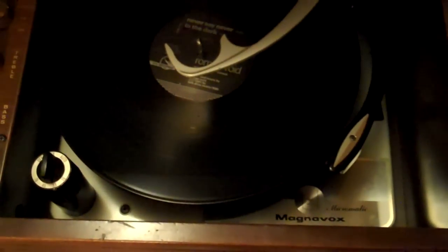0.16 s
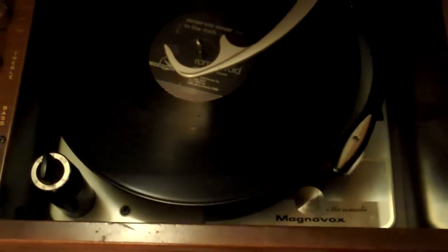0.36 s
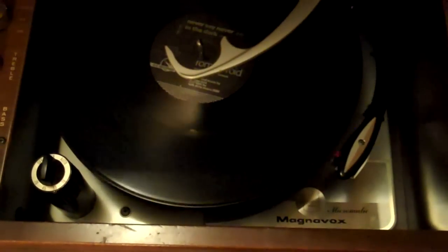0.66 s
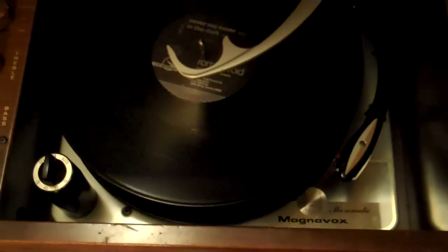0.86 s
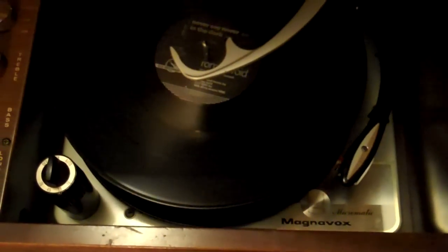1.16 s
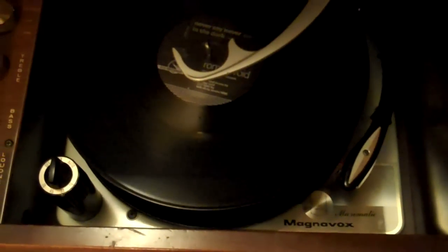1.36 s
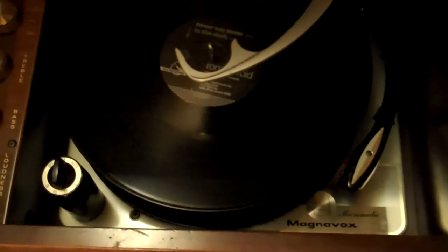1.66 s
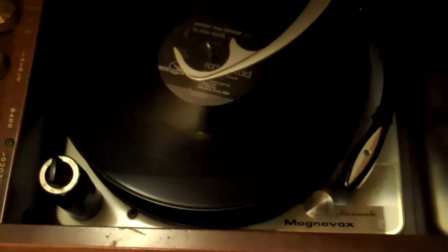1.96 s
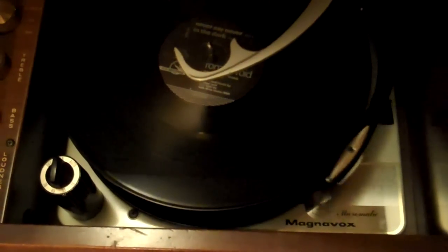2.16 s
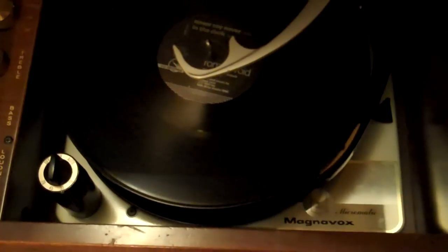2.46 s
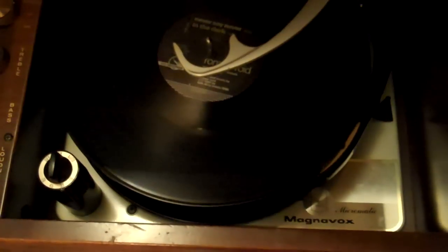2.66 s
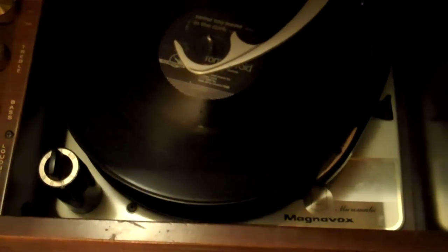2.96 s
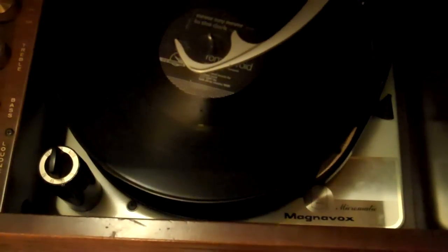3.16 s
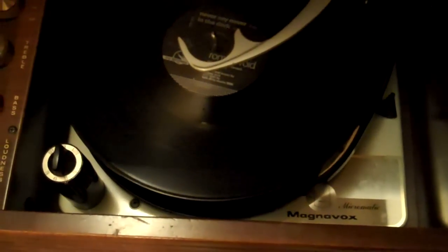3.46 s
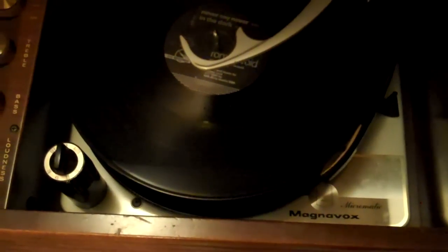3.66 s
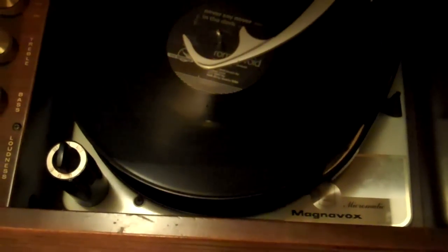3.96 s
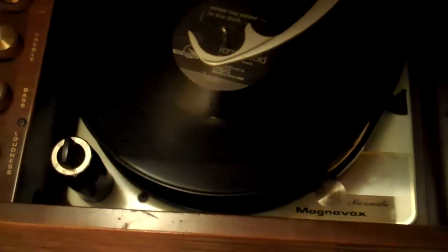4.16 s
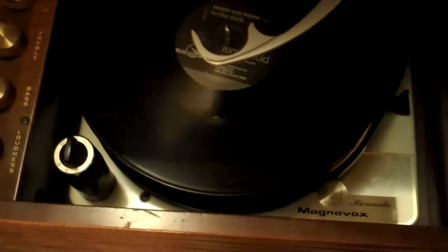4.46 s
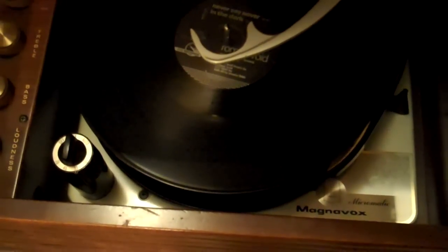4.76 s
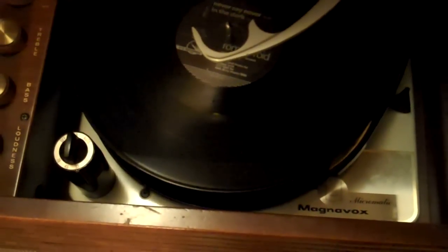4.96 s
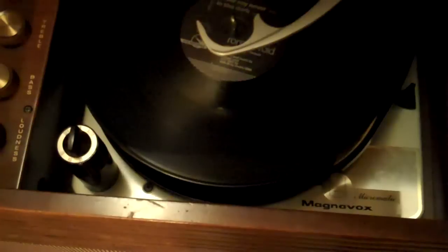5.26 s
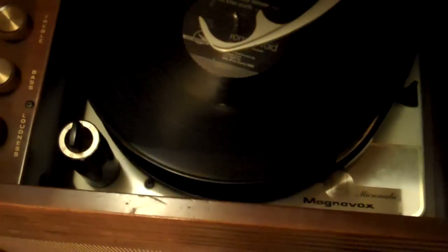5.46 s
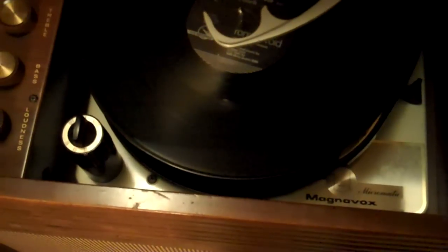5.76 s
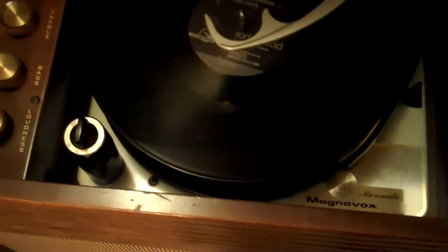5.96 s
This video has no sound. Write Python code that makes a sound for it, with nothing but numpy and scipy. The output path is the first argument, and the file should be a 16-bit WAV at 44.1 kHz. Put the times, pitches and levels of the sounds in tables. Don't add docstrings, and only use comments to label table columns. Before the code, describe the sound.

A record changer in an open wooden cabinet runs through its cycle, heard very close in a quiet room. A metallic click leads to a loud cluster of clacks and a shuddering rattle, then a few small ratchet ticks and a lighter click. Sliding parts scrape softly, low wooden thumps follow, and a second set of bright snaps ends in faint settling over low hum and hiss.

```python
import sys
import numpy as np
from scipy import signal
from scipy.fft import rfft, irfft, next_fast_len
from scipy.io import wavfile
from scipy.ndimage import uniform_filter1d

SR = 44100
rng = np.random.default_rng(int(sys.argv[2]) if len(sys.argv) > 2 else 0)


def ratio_of_db(decibels):
    return 10 ** (np.asarray(decibels, float) / 20)


def store_wav(level_fs):
    pcm = np.round(np.clip(np.atleast_2d(level_fs), -1, 1) * 32767)
    wavfile.write(sys.argv[1], SR, pcm.T.astype(np.int16))


N = 269446
FAST = next_fast_len(N)
HZ = np.fft.rfftfreq(FAST, 1 / SR)

# (frequency [Hz], level [dB per Hz])
AIR_BASS = [(30, -22.5), (52, -9), (87, -14), (195, -3), (247, -9.5), (290, -10.5), (321, -7.5),
            (506, -11.5), (650, -10.5), (699, -10.5), (1500, -17), (1950, -29.5), (3300, -120)]
AIR_TREBLE = [(2000, -21), (3000, -27.5), (5000, -29), (7000, -31), (8000, -30), (9000, -33.5),
              (14100, -34), (14300, -78)]
# (frequency [Hz], likeness [0-1])
AIR_LIKENESS = [(60, 0.5), (130, 0.92), (290, 0.94), (640, 0.87), (1410, 0.6), (3100, 0), (6820, 0),
                (15000, 0.1)]
# (frequency [Hz], rms level [dB])
MOTOR_HUM = [(194, -73.5), (322, -63.5), (950, -76.5), (60, -92), (373, -69.5)]
# (multiple of mains [1], rms level [dB])
MAINS_BUZZ = [(4, -67), (9, -73.5), (10, -75), (11, -72.5), (13, -77.5), (17, -78), (27, -79.5), (35, -84),
              (39, -81), (49, -84), (51, -79), (53, -86), (57, -89.5), (63, -92), (65, -84.5), (67, -85.5),
              (81, -94), (87, -92), (120, -98)]
# (frequency [Hz], level [dB])
CASE_FLUTTER = [(18.1, -71.5), (18.45, -68.5), (18.7, -64)]
# (frequency [Hz], width [Hz], gain [1])
PORT_CAVITIES = [(8500, 1700, .72), (6000, 1200, -.25)]

# (frequency [Hz], width [Hz], level [dB])
RUBBED_PARTS = [(2350, 41, -5), (2650, 9.9, -4), (3100, 17, -14.5), (3505, 92, -6.5), (4450, 42, -8),
                (4820, 21, -10), (5507, 130, -9), (6240, 170, -1), (6520, 190, -6), (6500, 52, -7),
                (7600, 570, 3)]
# (time [s], hold [s], dull scrape level [dB], bright re dull level [dB])
SLIDING_MOVES = [
    (0.0, 0.095, -58.5, -1.5),
    (0.473, 0.12, -82, 15),
    (0.739, 0.057, -76, -7),
    (0.921, 0.019, -52, 18),
    (1.169, 0.083, -76.5, -16.5),
    (2.049, 0.29, -66, -7.5),
    (3.445, 0.14, -66.5, -1.5),
    (4.19, 0.052, -59, 0),
    (4.333, 0.019, -42, 5.5),
    (4.496, 0.2, -81.5, 8.5),
]
# (time [s], level [dB])
PLATE_SHUDDER = [
    (0.915, -30.5),
    (0.967, -29.5),
    (1.001, -28),
    (1.02, -37.5),
    (1.042, -30),
    (1.05, -26.5),
    (1.1, -40),
    (1.17, -63),
]
# (start [s], end [s], frequency [Hz], width [Hz], rms level [dB])
SQUEAK_EVENTS = [(0.038, 0.133, 5450, 200, -59), (0.789, 0.794, 5900, 400, -37),
                 (0.804, 0.845, 1030, 250, -47), (2.124, 2.246, 4450, 700, -64),
                 (2.09, 2.308, 7700, 500, -69), (2.222, 2.28, 6000, 200, -66),
                 (3.562, 3.632, 4450, 250, -63), (3.554, 3.598, 6600, 1500, -52),
                 (3.926, 4.019, 5410, 3500, -62), (4.213, 4.265, 730, 250, -45.5),
                 (4.541, 4.862, 6240, 452, -67.5), (4.556, 4.776, 2490, 80.3, -69),
                 (4.544, 4.677, 7320, 302, -64.5), (5.905, 5.927, 717, 300, -55)]

# (frequency [Hz], level [dB], T60 [s])
CABINET_MODES = [(86.06, -10.5, 0.11), (151, -2.5, .12), (188, -3, 0.095), (284, -7, 0.1), (335, -9, 0.086),
                 (357, -8, 0.21), (500, -13, 0.098), (614, -13.5, 0.11), (655, -9.5, 0.034)]
# (time [s], peak level [dB], T60 [s])
CABINET_THUMPS = [(0.696, -36, 0.06), (0.856, -30, 0.15), (0.885, -30.5, 0.14), (1.879, -52, 0.063),
                  (3.148, -43.5, 0.098), (3.188, -39.5, 0.065), (3.248, -40.5, 0.048), (3.368, -35, 0.081),
                  (3.384, -35.5, 0.14), (3.452, -25, 0.07), (3.476, -30, 0.091), (3.575, -35, 0.045),
                  (3.591, -33.5, 0.13), (3.897, -42, 0.13), (4.179, -52, 0.097), (4.273, -37, 0.062),
                  (4.292, -31, 0.21), (4.357, -36, 0.16), (4.447, -38, 0.11), (4.549, -40, 0.051)]

# (time [s], peak level [dB],
# pitch [Hz], T60 [ms])
SMALL_TAPS = [(0.242, -25, 4530, 42), (.2430, -12.5, 6500, 10), (.2480, -26, 6430, 12),
              (0.6988, -12.5, 5840, 3.9), (0.704, -9, 6200, 27), (0.7081, -8, 7000, 9.1),
              (.7090, -12, 4100, 11), (0.715, -26, 6600, 53), (.8080, -43, 7400, 15),
              (0.86, -1.5, 7050, 15), (0.8606, -11, 1470, 8.3), (0.8592, -5, 3630, 9.8),
              (0.8641, -16, 1410, 28), (0.871, -17.5, 1454, 30), (.8828, -14, 800, 27),
              (0.883, -4, 6195, 10), (0.884, -11, 2470, 26), (.8920, -10.5, 2280, 14),
              (.9005, -14, 700, 13), (.9022, -5, 8020, 9), (.9035, -8, 6450, 16), (.9060, -12, 1712, 20),
              (1.8686, -26, 2255, 15), (1.8700, -25.5, 4800, 7.8), (1.8705, -42, 905, 13),
              (1.8735, -40, 8000, 20), (1.881, -39, 690, 15), (1.8816, -17.5, 7450, 22),
              (1.8863, -17.5, 7800, 19), (1.9000, -49, 7600, 10.1), (3.3690, -44.5, 2500, 12),
              (3.4540, -29.5, 558, 20), (3.4940, -46, 6340, 27), (3.576, -40, 2690, 6),
              (3.5780, -42, 870, 50), (4.1935, -29, 7770, 18), (4.2742, -16, 6490, 12),
              (4.2795, -21, 6500, 15), (4.2907, -8.5, 7740, 8.8), (4.2904, -8, 10170, 5),
              (4.2960, -18, 6400, 22), (4.3015, -23, 6500, 31), (4.322, -29, 8500, 43),
              (4.3528, -17.5, 7770, 8.5), (4.3605, -17.5, 3090, 17), (4.362, -17, 5600, 10),
              (4.3625, -21, 7600, 9), (5.9050, -43.5, 807, 19), (.0020, -48, 1230, 95),
              (.7040, -16, 3450, 12), (.8870, -14, 1127, 42),
              (.020, -47, 760, 40), (.060, -49, 694, 76), (.085, -47, 684, 60), (.110, -47, 696, 50),
                  (.2405, -17, 6320, 16), (0.2402, -19, 7700, 6.6), (.241, -40.5, 573, 77),
                  (.2545, -32, 6500, 10), (0.5335, -29, 3350, 12), (.5352, -26, 7630, 6),
                  (.5355, -28.5, 5230, 8), (.762, -33, 6000, 8), (.8995, -12, 7460, 8),
                  (0.9223, -16.5, 6810, 12), (0.926, -16.5, 2720, 8), (.942, -19, 8300, 8.6),
                  (.953, -25, 6500, 14), (.960, -19, 2770, 10), (.983, -27, 760, 40), (.996, -26, 880, 39),
                  (1.008, -29, 7200, 10), (1.012, -32, 945, 15), (1.0448, -29, 8000, 7.8),
                  (1.0455, -24, 935, 19), (1.054, -32, 6500, 10), (1.067, -30, 6240, 10),
                  (1.07, -27, 2800, 8.8), (2.0805, -42, 2000, 5), (2.093, -39, 2080, 6.2),
                  (2.0935, -42.5, 3460, 7.4), (2.100, -42, 673, 25), (2.329, -45, 940, 16),
                  (2.334, -43.5, 7640, 8), (2.353, -35, 3170, 6), (2.354, -36, 2900, 7),
                  (2.353, -37, 560, 26), (2.916, -32.5, 6020, 9), (2.9177, -38, 1835, 14),
                  (2.926, -41.5, 1049, 23), (3.388, -48, 82, 68), (3.465, -42, 85.3, 100),
                  (3.469, -44, 2880, 8), (3.4775, -40.5, 2400, 18), (3.591, -44.5, 82, 90),
                  (4.27, -32.5, 513, 40), (4.295, -44.5, 85, 91), (5.904, -44.5, 7250, 9.5),
                  (3.368, -33, 190, 36), (3.4533, -27, 192, 24), (3.5758, -29.5, 240, 17)]
# (time [s], peak level [dB], modes as (frequency [Hz], level [dB], T60 [s]))
RINGING_PARTS = [
    (.2400, -14.5, [(1750, -19, .025), (3350, -12, .07), (4680, -5, .07), (6400, 0, .035), (6620, -4, .06), (7350, -14, .09), (8350, -7, .06), (10300, -13, .045)]),
    (.5340, -29, [(3400, -4, .014), (4250, -2, .026), (5136, -6, .025), (7790, -12, .035)]),
    (.6985, -15.5, [(581, 0, 0.055), (797, -6, 0.069), (1050, -14, 0.22)]),
    (1.8815, -22, [(4250, -4, .02), (5000, -5, .025), (7310, -2, .025), (7790, 0, .03)]),
    (2.3535, -31, [(547, 0, .045), (2140, -8, .025), (2600, -5, .025), (3090, -5, .025)]),
    (4.2900, -19.5, [(9900, -6, .015), (6519, -1, .075), (7604, 1, .03), (8349, -7, .06)]),
    (4.3605, -18, [(2950, -4, .03), (3060, 0, .04), (5600, -8, .02), (6470, -10, .035), (7700, -6, .02)]),
]

# (frequency [Hz], level [dB], T60 [s])
PLATE_LOW_MODES = [(452, -17, 1.0), (550.4, -6, 0.18), (676, -4, 0.2), (890, -6, 0.092), (1075, -8, 0.39),
                   (1180, -9.5, 0.72)]
PLATE_MID_MODES = [(1726, -10, 0.088), (2175, -4.5, 0.043), (2600, -17, 0.14), (2340, -15.5, 0.29),
                   (2940, -19.5, 0.064), (2686, -6, 0.13), (3262, -4, 0.046), (3360, -17, 0.15),
                   (3880, -21.5, 0.11)]
PLATE_TOP_MODES = [(4160, -18, 0.14), (4950, -15.5, 0.093), (5550, -22, 0.076), (6680, -3.5, 0.085),
                   (7617, -7.5, 0.034), (7620, -0.5, 0.038), (8410, 2.5, 0.026), (7860, -5, 0.09)]
PLATE_EDGE_MODES = [(9800, -2, .03), (10750, -3.5, 0.024), (10600, -6, 0.033)]
# (frequency [Hz], level [dB per Hz])
CRACK_SPECTRUM = [(180, -48), (300, -16), (378, -9.5), (824, -7), (1310, -7), (1710, -5.5), (2380, -8.5),
                  (2580, -7), (4250, -9), (6320, -9), (8240, -7.5), (13500, -31), (15700, -46.5)]
# (time [s], treble peak level [dB], middle re treble level [dB], rattle T60 [ms])
LATCH_SPRINGS = [(.23, -59, -8, 30), (.2401, -19.5, -11, 15), (.2445, -11, -14.5, 16),
                 (.7032, -7.5, -6, 35), (.859, 0.5, -6.5, 16), (.901, -2, -11.5, 38), (.927, -16, -2, 91),
                 (1.8805, -16.5, -5.5, 39), (4.2703, -23.5, 1, 34), (4.274, -12.5, -5.5, 41),
                 (4.279, -23.5, -1.5, 220)]
PAWLS = [(.5346, -25, -10, 29), (.54, -37, -15, 33), (.6985, -17, -2.5, 52), (.7086, -12, -10.5, 40),
         (3.144, -46.5, -0.5, 54), (3.5763, -48, 6.5, 41), (3.948, -42, -3.5, 53), (4.0, -52, 5, 33),
         (4.195, -30, -3.5, 122), (4.29, -9, -13, 10.5), (4.302, -17.5, -8, 115), (4.448, -27, -3, 212),
         (5.9035, -43.5, -6, 20.6)]
THIN_LEVERS = [(.716, -30, 14, 35), (.7615, -34, 13.5, 25), (.7887, -27.5, 2.5, 21), (.889, -10.5, 4, 24),
               (.8985, -9, 4.5, 120), (.906, -8, -2, 52), (.945, -14.5, -2.5, 60), (1.0448, -17.5, -2, 34),
               (1.8692, -32.5, 7.5, 23.04), (1.872, -52.5, 6, 24), (2.8965, -35, -1.5, 28.15),
               (2.916, -26, -7.5, 43), (4.3606, -11.5, -6.5, 32.3)]
CAM_FOLLOWERS = [(.796, -34.5, 10.5, 21), (.805, -34, 0, 98), (.838, -39, 3, 30), (.864, -10.5, 2.5, 110),
                 (.883, 4.5, -11.5, 27), (1.01, -24, -3, 37), (1.832, -52, 4.5, 31), (2.0925, -46.5, 9, 52),
                 (2.344, -52, 13.5, 50), (2.352, -36, -1, 20), (2.359, -51.5, 9, 27),
                 (3.3688, -50.5, 7.5, 35), (3.454, -49, 14, 5), (3.4774, -34.5, 0.5, 80),
                 (3.493, -35, -5, 64), (4.176, -35, 4, 36), (4.183, -31, 0, 66)]
# (time [s], treble peak level [dB], middle re treble level [dB], rattle T60 [ms])
HARD_PINS = [
    (2.063, -48.5, -2.5, 30),
    (2.3275, -37.5, -8.5, 22),
    (3.384, -39.5, 0, 30),
    (4.1127, -42, -4, 20),
    (4.3518, -13, -21, 16),
    (4.5021, -30, -10, 69),
    (4.696, -44.5, -5.5, 24),
]
# (treble peak level [dB], middle re treble level [dB], rattle T60 [ms])
RATCHET_TOOTH = (-35.5, -2, 39)


def shape(table, hz):
    f, v = np.transpose(table)
    return np.interp(np.log(hz + 1e-9), np.log(f), v)


def band(x, lo_hz, hi_hz):
    return signal.sosfilt(signal.butter(2, [lo_hz, hi_hz], "band", fs=SR, output="sos"), x)


def colour(x, table):
    n = next_fast_len(x.shape[-1])
    gain = ratio_of_db(shape(table, np.fft.rfftfreq(n, 1 / SR)))
    return irfft(rfft(x, n) * gain, n)[..., :x.shape[-1]]


def unit(x):
    return x / np.sqrt(np.mean(x ** 2))


def fade(t, t60):
    return np.exp(-np.log(1000) * t / np.maximum(t60, 1e-3))


def walk(rate):
    k = int(SR / rate)
    steps = np.repeat(rng.standard_normal(N // k + 1), k)
    return 1.3 * uniform_filter1d(uniform_filter1d(steps, k), k)[:N]


def pair(noise, alike):
    alike = np.clip(alike, 0, 1)
    mid = np.sqrt((1 + alike) / 2) * noise[0]
    side = np.sqrt((1 - alike) / 2) * noise[1]
    return np.array([mid + side, mid - side])


def ring(modes, t, longest_s, scatter_db):
    hz, db, t60 = np.transpose(modes)[:, :, None]
    detune, phase, level = rng.standard_normal((3, len(modes), 1))
    tones = np.sin(2 * np.pi * hz * (1 + 0.0065 * detune) * t + 2 * phase)
    return np.sum(ratio_of_db(db + scatter_db * level) * fade(t, np.minimum(t60, longest_s)) * tones, axis=0)


def add(out, s, sound, peak_db):
    i = int(s * SR)
    piece = sound[..., :N - i]
    out[:, i:i + piece.shape[-1]] += piece * ratio_of_db(peak_db) / np.max(np.abs(sound))


def curve(table, column_db):
    s = np.transpose(table)[0]
    return uniform_filter1d(ratio_of_db(np.interp(np.arange(N) / SR, s, column_db, -120, -120)), 600)


def swell(s, rise_s, hold_s, db, db_per_s):
    t = np.arange(N) / SR - s
    rise = np.clip(t / max(rise_s, 1e-3), s <= 0, 1)
    return rise * ratio_of_db(db - db_per_s * np.maximum(t - rise_s - hold_s, 0))


def air():
    spectra = pair(rfft(rng.standard_normal((2, FAST))), shape(AIR_LIKENESS, HZ))
    both = irfft(spectra * ratio_of_db(shape(AIR_BASS[:-2] + AIR_TREBLE, HZ)), FAST)[:, :N]
    balance_db = np.array([[-.6], [.6]])
    return unit(both) * ratio_of_db(-50 - 3.0 + 0.35 * walk(0.57) + balance_db)


def motor():
    t, mains_hz = np.arange(N) / SR, 60.015
    hum = sum(ratio_of_db(db + 2.2 * walk(8.4)) * np.sin(2 * np.pi * hz * t + 1.7 * walk(5.9))
              for hz, db in MOTOR_HUM)
    buzz = sum(ratio_of_db(db + 1.3 * walk(3.9)) * np.sin(2 * np.pi * k * mains_hz * t + k)
               for k, db in MAINS_BUZZ)
    flutter = sum(ratio_of_db(db) * np.sin(2 * np.pi * hz * t + 1.316) for hz, db in CASE_FLUTTER)
    return np.sqrt(2) * (hum + buzz + flutter * np.array([[-.4], [.9]]))


def sliding():
    bursts_db = 1.5 * rng.exponential(size=N // 64 + 1).repeat(64)[:N]
    grains = rng.standard_normal((6, N)) * ratio_of_db(bursts_db)
    singing = sum(ratio_of_db(db) / (1 + 1j * (HZ - hz) / width) for hz, width, db in RUBBED_PARTS)

    def rub(two_grains, alike):
        return irfft(rfft(pair(two_grains, alike), FAST) * (ratio_of_db(-1.0) + singing), FAST)[:, :N]

    bright = unit(band(band(rub(grains[:2], 0.28), 3600, 9400), 2992, 11000)) * ratio_of_db(0.82 * walk(55))
    dull = unit(band(rub(grains[2:4], 0.33), 860, 3800)) * ratio_of_db(1.4 * walk(25))
    shudder = unit(band(colour(pair(grains[4:], 1.0), CRACK_SPECTRUM), 380, 1300)) * ratio_of_db(1.6 * walk(55))
    gears = unit(band(rng.standard_normal(N), 128, 198)) * ratio_of_db(2.3 * walk(14))

    cycle_ends_s, idle_db = 4.9, -3.5
    drag = ratio_of_db(idle_db * (np.arange(N) / SR > cycle_ends_s))
    hiss, scrape = drag * ratio_of_db(-67), drag * ratio_of_db(-66)
    grip_s, dull_db_per_s, bright_db_per_s = 0.026, 115.5, 298
    for s, hold_s, dull_db, bright_re_db in SLIDING_MOVES:
        hiss = hiss + swell(s, grip_s, hold_s, dull_db + bright_re_db, bright_db_per_s)
        scrape = scrape + swell(s, grip_s, hold_s, dull_db, dull_db_per_s)

    shake = curve(PLATE_SHUDDER, np.transpose(PLATE_SHUDDER)[1] - 3.)
    rubbing = bright * hiss + dull * (scrape + ratio_of_db(-0.5) * shake)
    gear_load = swell(2.91, rise_s=0.51, hold_s=1.04, db=-53, db_per_s=41)
    return rubbing + shudder * shake + gears * gear_load


def squeaks():
    out = np.zeros((2, N))
    for s0, s1, hz, width_hz, db in SQUEAK_EVENTS:
        i, n = int(s0 * SR), max(int((s1 - s0) * SR), 64)
        noise = pair(rng.standard_normal((2, 16384)), 0.94)
        squeak = unit(band(noise, hz - width_hz / 2, hz + width_hz / 2))[:, -n:]
        out[:, i:i + n] += ratio_of_db(db) * squeak * np.sqrt(np.sin(np.pi * np.arange(n) / n))
    return out


def cabinet():
    out, t = np.zeros((2, N)), np.arange(8000) / SR
    for s, db, t60 in CABINET_THUMPS:
        boom = pair([ring(CABINET_MODES, t, t60, scatter_db=2.5) for _ in range(2)], .88)
        add(out, s + .001, band(boom * (1 - np.exp(-t / .0015)), 70, 900), db)
    return out


def taps():
    out, t = np.zeros((2, N)), np.arange(4096) / SR
    for s, db, hz, t60_ms in SMALL_TAPS:
        lag, detune, phase = rng.standard_normal(3)
        slip = np.array([[1], [-1]]) * lag * hz / 16000
        twin_hz = hz * (1 + .025 * detune)
        tone = np.sin(2 * np.pi * hz * t + slip)
        twin = 1.5 * np.sin(2 * np.pi * twin_hz * t + 2 * phase - slip)
        onset = 1 - np.exp(-t / max(.0005, .6 / hz))
        add(out, s, (tone + twin) * fade(t, t60_ms / 1000) * onset, db)
    return out


def parts():
    out, t = np.zeros((2, N)), np.arange(8192) / SR
    for s, db, modes in RINGING_PARTS:
        chatter = ratio_of_db(-25) * pair(rng.standard_normal((2, len(t))), .7) * fade(t, .09)
        chatter[:, 0] = 1
        rung = signal.fftconvolve(chatter, ring(modes, t, .09, scatter_db=0)[None])[:, :len(t)]
        add(out, s, rung * (1 - np.exp(-t / .002)), db)
    return out


def strikers():
    first_s, spacing_s = 1.1957, .1293
    teeth = [(first_s + spacing_s * k, *RATCHET_TOOTH) for k in range(3)]
    return [(LATCH_SPRINGS, 6600, -12, 0.6), (PAWLS, 6900, -3, -0.6), (THIN_LEVERS, 2600, -9, -4),
            (CAM_FOLLOWERS, 2150, 0.6, -0.6), (teeth, 1720, -3, -3), (HARD_PINS, 7700, 1.5, 6)]


def strike(t, top_db, mid_db, rattle_ms, spot_hz, low_re_db, hard_db):
    # (from Hz, to Hz, modes, likeness of the ports, longest t60 s, ring dB, shiver dB)
    zones = ((4253, 7250, PLATE_TOP_MODES, 0.57, 0.022, -7.0, -21.5),
             (1500, 3600, PLATE_MID_MODES, 0.96, 0.031, -6.5, -18.0),
             (316, 1740, PLATE_LOW_MODES, 1.0, 0.11, -4.0, -8.5),
             (9580, 15100, PLATE_EDGE_MODES, 0.5, .03, -14.5, -20.5))
    chatter = (1 - np.exp(-t / .0006)) * fade(t, rattle_ms / 1000 * .7)
    spot = unit((np.sin(2 * np.pi * spot_hz * t) * fade(t, .014))[:2048])
    grit = ratio_of_db(1.4 * rng.exponential(size=len(t) // 64).repeat(64) * (t > .003))
    noise = colour(rng.standard_normal((2, len(t))), CRACK_SPECTRUM) * grit
    edge_db = -7.0 + 0.14 * top_db + hard_db
    levels_db = (0, mid_db, mid_db + low_re_db, edge_db)
    for (lo, hi, modes, alike, longest_s, ring_db, shiver_db), db in zip(zones, levels_db):
        zone = band(pair(noise, alike), lo, hi)
        body = unit(ring(modes, t[:2048], longest_s, scatter_db=3.5))
        if lo < spot_hz < hi:
            body = body + ratio_of_db(-7.5) * spot
        rung = signal.fftconvolve(zone * chatter, body[None])[:, :len(t)]
        crack = zone * (chatter + ratio_of_db(shiver_db) * fade(t, 0.15))
        yield unit(crack) + ratio_of_db(ring_db) * unit(rung), top_db + db


def levers():
    out, t = np.zeros((2, N)), np.arange(4096) / SR
    for blows, spot_hz, low_re_db, hard_db in strikers():
        for s, top_db, mid_db, rattle_ms in blows:
            for sound, peak_db in strike(t, top_db, mid_db, rattle_ms, spot_hz, low_re_db, hard_db):
                add(out, s - .0004, sound, peak_db)
    return out


def room(x, t60_s, damp_hz, wet_db):
    t = np.arange(SR // 2) / SR
    tail = pair(rng.standard_normal((2, len(t))), 0.75) * fade(t, t60_s) * (1 - np.exp(-t / 0.012))
    tail = band(tail, 150, damp_hz)
    tail = tail / np.sqrt(np.sum(tail[0] ** 2))
    return x + ratio_of_db(wet_db) * signal.fftconvolve(x, tail, axes=1)[:, :N]


def ports(x):
    lag_s, top_hz, shelf_db = 4e-5, 14300, -18
    cavity = sum(gain / (1 + 1j * (HZ - hz) / width) for hz, width, gain in PORT_CAVITIES)
    top = ratio_of_db(shelf_db / (1 + (top_hz / (HZ + 1)) ** 40))
    left = (1 + cavity) * np.exp(-2j * np.pi * HZ * lag_s) * ratio_of_db(0.1)
    right = (1 - cavity) * ratio_of_db(1.34)
    return irfft(rfft(x, FAST) * np.array([left, right]) * top, FAST)[:, :N]


def scene():
    background = air() + motor()
    struck = room(levers() + cabinet(), t60_s=0.27, damp_hz=9000, wet_db=-18.5)
    works = sliding() + squeaks() + taps() + band(parts(), 300, 15000) + struck
    return ports(band(works, 60, 15000)) + background


def top_cut(x):
    return signal.sosfilt(signal.butter(12, 15870, fs=SR, output="sos"), x)


def record(dry):
    mix = np.clip(dry, -1, 1)
    return top_cut(mix)


dry = scene()
out = record(dry)
store_wav(out)
```